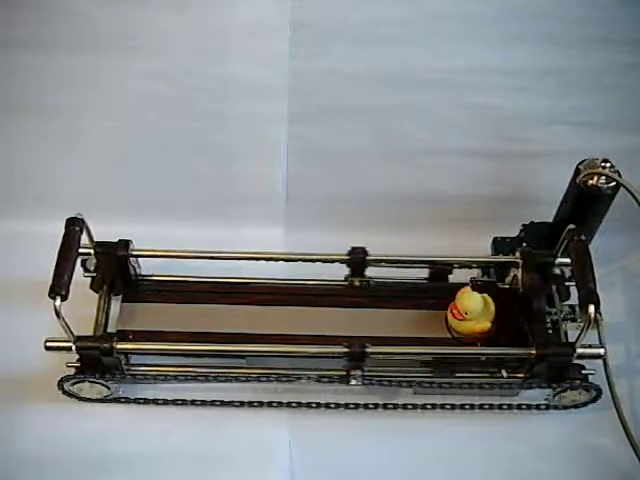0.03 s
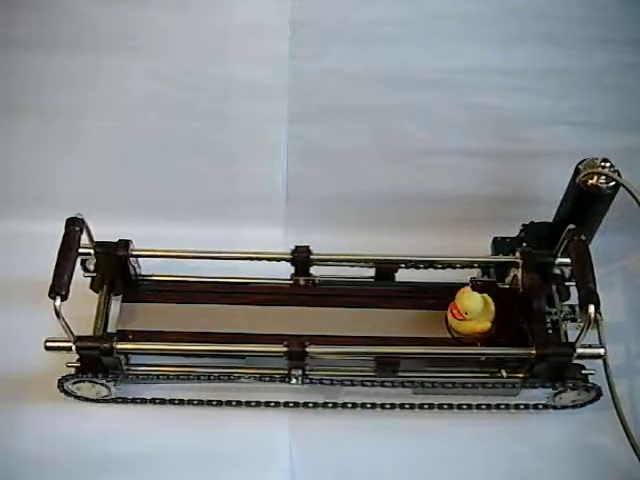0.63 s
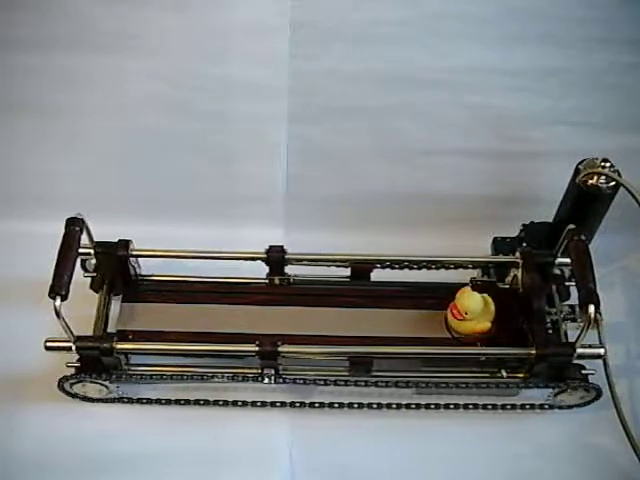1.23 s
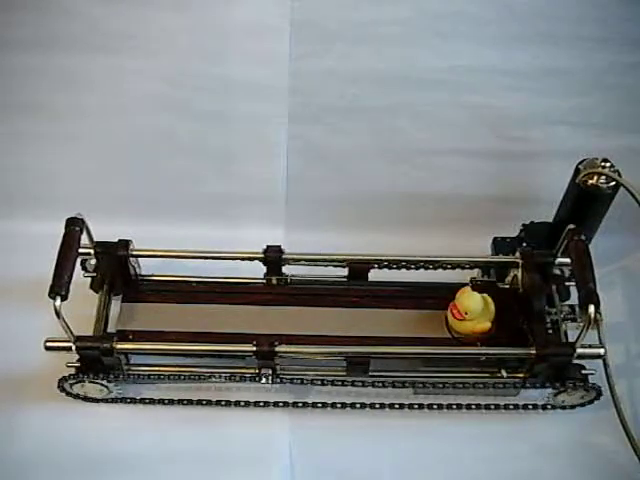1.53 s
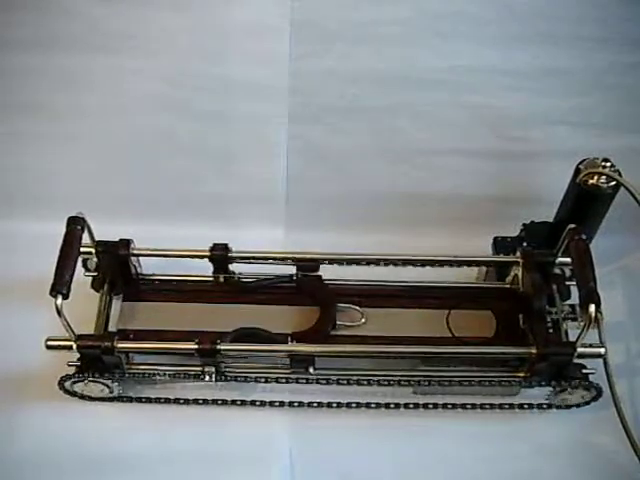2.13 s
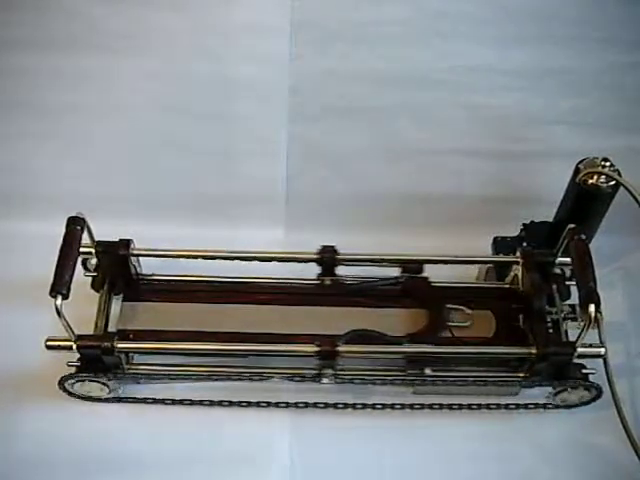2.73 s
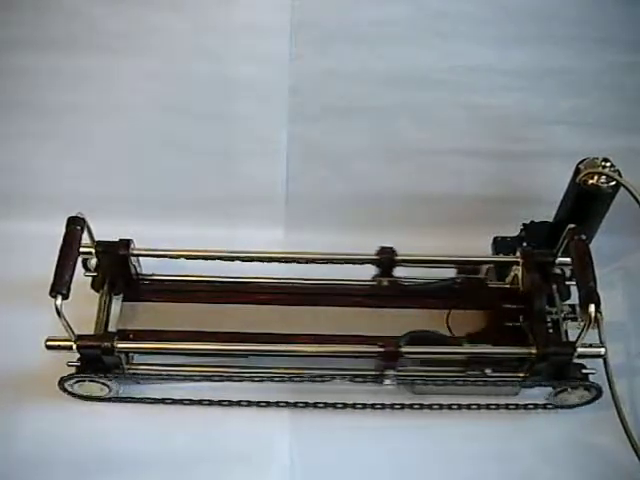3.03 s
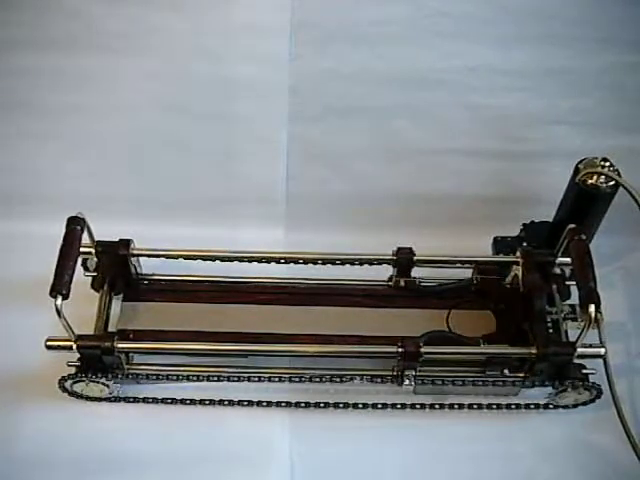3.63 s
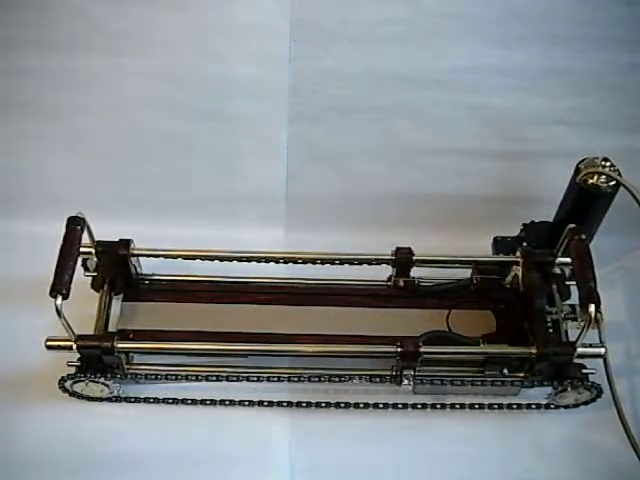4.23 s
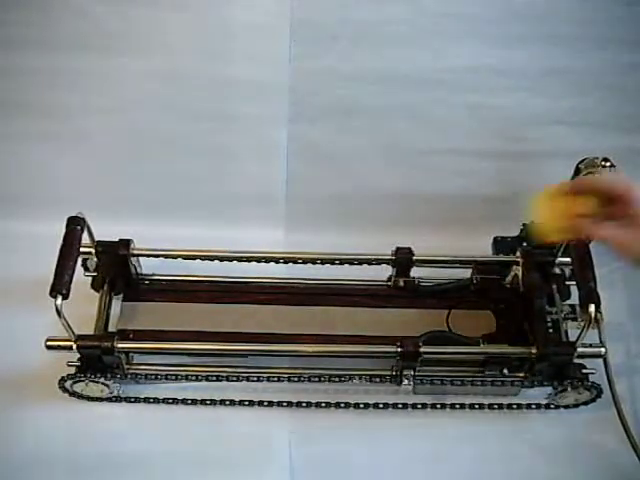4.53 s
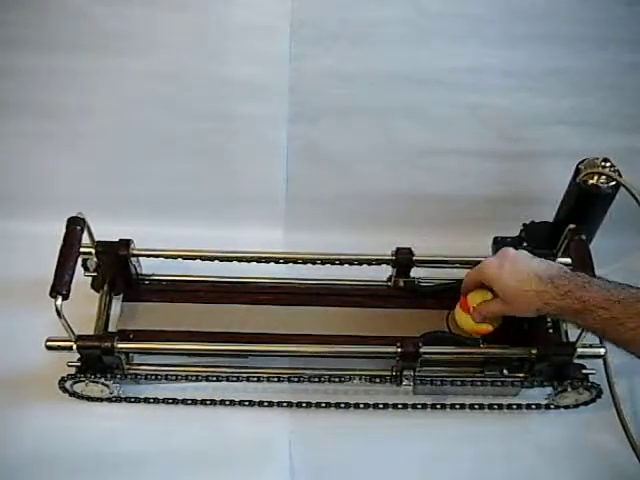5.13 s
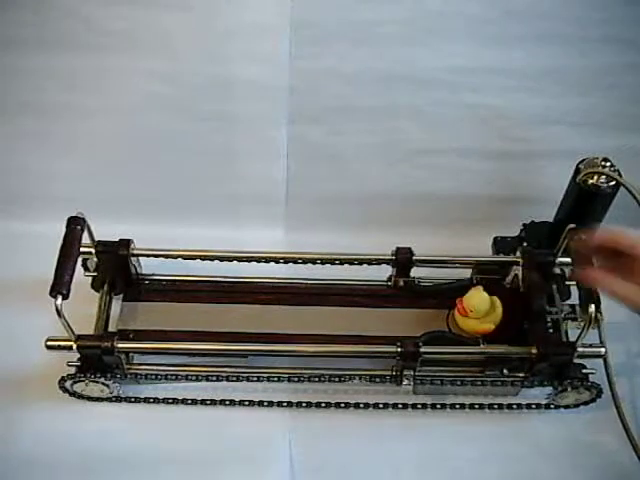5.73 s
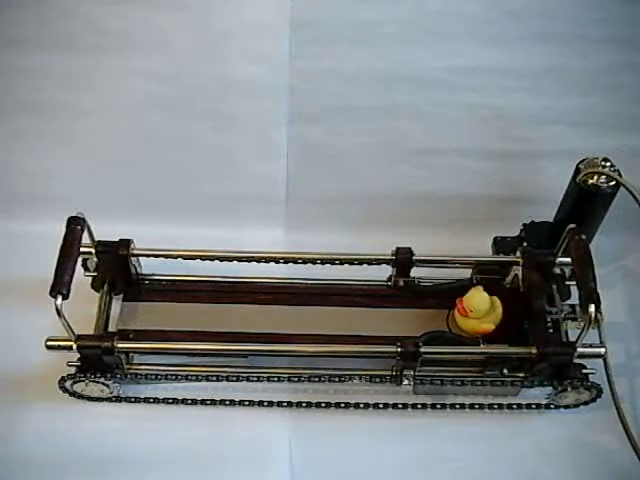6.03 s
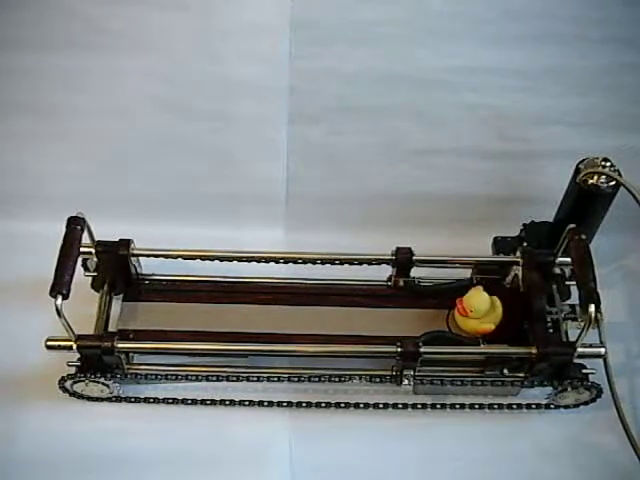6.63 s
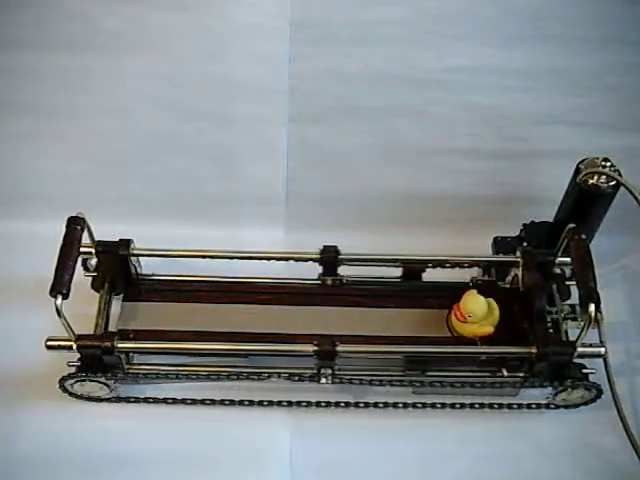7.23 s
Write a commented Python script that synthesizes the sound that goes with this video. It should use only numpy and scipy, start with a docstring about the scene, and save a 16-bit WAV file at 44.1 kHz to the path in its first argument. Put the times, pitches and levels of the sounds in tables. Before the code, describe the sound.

A motor and chain whir as they draw back a spring-loaded launcher. After a brief pause it fires with a loud, clanging slam and a duller bang right behind, overloading the close microphone. A rubber toy bounces, the sled scrapes back along its rails and a catch clicks shut. Later the drive restarts with a clank. Steady hiss, low rumble and fan hum fill the small room.

```python
"""Spring launcher on a table

Indoors, a small microphone close to a motorised launcher that fires a rubber toy. A chain drive draws
the springs; the latch lets go, the sled slams home and a duller bang follows, overloading the microphone.
The toy bounces, the sled scrapes back along its rails and latches with a click; later the drive takes
up the load again. Behind it all, a steady hiss, a low rumble and a fan's hum."""
import sys
import numpy as np
from scipy import signal
from scipy.fft import rfft, irfft, next_fast_len
from scipy.io import wavfile

SR = 44100
rng = np.random.default_rng(int(sys.argv[2]) if len(sys.argv) > 2 else 0)


def transcribe(u):
    """Save the signal u as a 16-bit wav file named by the first command-line argument.

    u: samples, shape (n,) or (channels, n), limited to [-1, 1]; the rate is SR.
    q: integer samples, one column per channel.
    """
    v = np.clip(np.atleast_2d(u).T, -1, 1)
    q = np.round(v * 32767).astype(np.int16)
    wavfile.write(sys.argv[1], SR, q)


N = 325017
TIME = np.arange(N) / SR


def amp(db):
    """Decibels to gain."""
    return 10 ** (np.asarray(db) / 20)


def unit(x):
    """Scales to rms 1."""
    return x / np.sqrt(np.mean(x ** 2) + 1e-20)


def add(mix, start_s, sound):
    """Mixes a sound in at its start time."""
    part = mix[round(start_s * SR):][:len(sound)]
    part += sound[:len(part)]


def colour(x, spectrum):
    """Filters x by a curve of (freq_hz, gain_db) points joined on a log-frequency axis."""
    size = next_fast_len(len(x))
    hz, db = np.transpose(spectrum)
    gain_db = np.interp(np.log(np.fft.rfftfreq(size, 1 / SR) + 1), np.log(hz + 1), db)
    return irfft(rfft(x, size) * amp(gain_db), size)[:len(x)]


def resonate(x, rings):
    """Passes x through steep parallel resonances (centre_hz, width_hz, level_db); rms 1 out."""
    out = 0
    for hz, width, db in rings:
        b, a = signal.iirpeak(hz, hz / width, SR)
        out = out + amp(db) * unit(signal.lfilter(b, a, signal.lfilter(b, a, x)))
    return unit(out)


def low_pass(x, hz, taps):
    """A steep band limit."""
    return signal.oaconvolve(x, signal.firwin(taps, hz, window=("kaiser", 9), fs=SR), "same")


def ring(modes, t):
    """Dying sines of random phase."""
    return sum(amp(db - 60 * t / t60) * np.sin(2 * np.pi * (hz * t + rng.random()))
               for hz, db, t60 in modes)


def drift(per_s):
    """A slow random curve of rms 1."""
    knots = rng.standard_normal(2048)
    return unit(np.interp(TIME * per_s, np.arange(len(knots)), knots))


def ticks(per_s, spread_db):
    """Random tiny impacts, their sizes scattered by spread_db."""
    size = amp(spread_db * np.minimum(rng.exponential(1, N), 4)) * rng.choice([-1, 1], N)
    return unit(size * (rng.random(N) < per_s / SR))


def stroke(start_s, stop_s, attack_s, release_db_per_s):
    """Attack, hold and release, as a gain at every sample."""
    attack = 1 - np.exp(-np.maximum(TIME - start_s, 0) / attack_s)
    return attack * amp(-release_db_per_s * np.maximum(TIME - stop_s, 0))


def frame_blows(modes_db=-17, rise_s=0.0006, rattle_t60_s=0.12, damping_db_per_s=70):
    """Each blow sets the frame rattling and ringing; hard contacts are bright, soft ones thud."""
    # release, two slams, knocks of the return, the drive's clank: start_s, level_db, bass_db, treble_db
    blows = [ (1.631, -48, -5, 9.5), (1.6418, -12.5, -10, 4), (1.6651, 1, -6, -1), (1.683, -7, 6.5, 0.5),
             (1.7155, -6, -14, -26), (1.733, -15, -13, -7), (1.755, -21.5, 8, -4), (1.7962, 2, -3, -13),
             (1.812, -6.5, 0, -37), (1.851, -26, 17, 2), (1.909, -32, -6, -1.5), (2.066, -40.5, -14, -2),
             (2.0803, -36.5, 3, 0.5), (2.381, -35.5, 11, -10), (2.552, -37, 19.5, -3),
             (2.9396, -39.5, -5, 5), (3.005, -33, -11, -2.5), (3.058, -34.5, -2, 1), (3.484, -45, 6, -5),
             (3.724, -39, -9, -27), (3.811, -38.5, 2, -8), (6.695, -37, 7, -4), (6.715, -29.5, -8, 3.5),
             (6.752, -38, 6, -5)]
    # dense ringing of the frame: freq_hz, density_db
    frame_spectrum = [(30, -8.5), (60, -11), (125, -7.5), (240, -13), (335, -9), (560, -14), (850, -8),
                      (1030, -12.5), (1300, -16), (1650, -14), (2450, -10), (3400, -12), (4700, -15),
                      (5900, -23)]
    # its strongest modes, before the joints damp them: pitch_hz, level_db, t60_s
    frame_modes = [(118.3, -7, 0.23), (130.4, 3, 0.21), (175.7, 5.5, 0.22), (289.5, -4.5, 0.19),
                   (337, 7, 0.05), (498, -6, 0.29), (656, -2, 0.12), (770, 0, 0.083), (826, -3, 0.2),
                   (853, 2.5, 0.17), (1130, -2, 0.068), (1265, 5.5, 0.095), (1450, 4, 0.056),
                   (1710, -17, 0.13), (1804, -7, 0.14), (2000, -1.5, 0.25), (2355, 3, 0.17),
                   (2590, -4, 0.1)]
    out, t = np.zeros(N), np.arange(SR // 2) / SR
    for start_s, db, bass_db, treble_db in blows:
        rattle = unit(colour(rng.standard_normal(len(t)), frame_spectrum)) * amp(-60 * t / rattle_t60_s)
        tones = amp(modes_db - damping_db_per_s * t) * ring(frame_modes, t)  # loose joints soak it up
        hit = (rattle + tones) * (1 - np.exp(-t / rise_s))
        contact = [(150, bass_db), (600, 0), (1400, 0.0016), (4500, treble_db)]
        padded = np.pad(hit, (SR // 100, 0))  # 10 ms of lead for the filter to spread into
        add(out, start_s - .01, amp(db) * colour(padded, contact))
    return out


def springs(rise_s=0.0015, t60_s=0.15):
    """The springs and guide rods take up each jolt and clang in many close modes."""
    # jolts to the steel: start_s, level_db
    jolts = [(1.6437, -11.5), (1.65, -19), (1.666, -8), (1.692, -12), (6.657, -40), (6.716, -42)]
    # its bright clusters of modes: centre_hz, width_hz, level_db
    steel_rings = [(1320, 140, 1), (1980, 170, -6), (2390, 220, -2.5), (2674, 450, 7.5), (3210, 220, -14),
                   (3970, 200, -7.5), (4050, 240, -13), (4760, 600, 0.5)]
    out, t = np.zeros(N), np.arange(SR // 2) / SR
    for start_s, db in jolts:
        clang = resonate(rng.standard_normal(len(t)), steel_rings)
        add(out, start_s, amp(db - 60 * t / t60_s) * clang * (1 - np.exp(-t / rise_s)))
    return out


def catch(snap_db=-4, snap_t60_s=0.055, rise_s=0.0008):
    """The small steel catch snaps over the sled and bounces."""
    # shutting and settling: start_s, level_db
    clicks = [(3.7887, -25), (3.7973, -29.5)]
    # the catch's modes: pitch_hz, level_db, t60_s
    catch_modes = [(1500, -19, 0.027), (2270, -9, 0.026), (2980, -0.5, 0.039), (3520, -6, .03),
                   (3540, -17, 0.063)]
    # its dry snap: freq_hz, density_db
    snap_spectrum = [(400, -0.5), (1300, -12), (2400, -1.5), (3500, 3), (4100, -13), (5500, -19)]
    out, t = np.zeros(N), np.arange(SR // 5) / SR
    for start_s, db in clicks:
        noise = unit(colour(rng.standard_normal(len(t)), snap_spectrum))
        snap = amp(snap_db - 60 * t / snap_t60_s) * noise
        add(out, start_s, amp(db) * (ring(catch_modes, t) + snap) * (1 - np.exp(-t / rise_s)))
    return out


def sled(start_s=2.075, meets_catch_s=2.95, stop_s=3.085, grind_rise_db_per_s=60.5):
    """Grains of friction ring the rails as the sled is hauled back; last, it grinds up the catch."""
    # broad scrape of the rails: freq_hz, density_db
    rail_spectrum = [(29, -38), (50, -2), (130, -17), (301, -11.5), (391, -35), (468, -17), (1040, -18.5),
                     (1150, -18), (1610, -27.5), (2880, -26), (3370, -27), (4930, -29), (5900, -34.5),
                     (7670, -54), (13000, -120)]
    # their resonances: centre_hz, width_hz, level_db
    rail_rings = [(805, 110, -6), (1170, 110, -9), (1980, 240, -1), (2440, 360, 0), (2810, 520, 1),
                  (3940, 120, -10), (4310, 1200, -17)]
    grains = ticks(per_s=2500, spread_db=2) * amp(1.3 * drift(per_s=50))
    scrape = amp(3) * unit(colour(grains, rail_spectrum)) + amp(-8) * resonate(grains, rail_rings)
    grind = resonate(ticks(per_s=2000, spread_db=0), [(2370, 1000, 0.015), (4250, 910, 0)])
    rub_db = -48.5 + 4.5 * np.exp(-((TIME - 2.45) / 0.086) ** 2)  # a tight spot on the rails
    press_db = -49 + grind_rise_db_per_s * (np.clip(TIME, meets_catch_s, stop_s) - meets_catch_s)
    sliding = stroke(start_s, stop_s, attack_s=0.0069, release_db_per_s=330)
    climbing = stroke(meets_catch_s, stop_s, attack_s=.003, release_db_per_s=594)
    return sliding * amp(rub_db) * scrape + climbing * amp(press_db) * grind


def drive_effort(surge_db=6.5, surge_s=0.046):
    """How hard the drive runs, as a gain: each spell surges, sags as any load builds, and runs down."""
    # drawing, hauling back, creeping to the latch, drawing again: start_s, stop_s, level_db, sag_db_per_s
    spells = [(-.3, 1.4, 1.5, 11), (2.15, 3.1, -2.5, 0), (3.1, 3.75, -14, 3), (6.665, 7.45, 1, 10)]
    out = np.zeros(N)
    for start_s, stop_s, db, sag_db_per_s in spells:
        age = np.maximum(TIME - start_s, 0)
        running = stroke(start_s, stop_s, attack_s=0.012, release_db_per_s=107)
        out += running * amp(db + surge_db * np.exp(-age / surge_s) - sag_db_per_s * age)
    return out


def chain_drive(effort, gears_db=-44, chain_db=-50.5, links_per_s=26):
    """Gears growl in their housing; the chain rustles onto the sprocket and once squeaks faintly."""
    # resonances of the gearbox: centre_hz, width_hz, level_db
    gearbox_rings = [(164.4, 41, -2), (217, 16, -16.5), (282, 51, -0.5), (546, 61, -12.5), (737, 32, -16.5)]
    # resonances of the chain: centre_hz, width_hz, level_db
    chain_rings = [(1183, 340, 2), (1420, 98, -14.5), (2016, 69, -3.5), (2480, 710, 2), (2704, 70, -7.5),
                   (2950, 100, -4), (3670, 1040, 0.5), (4360, 1100, -1), (4770, 320, -9.5)]
    growl = resonate(rng.standard_normal(N), gearbox_rings)
    links = np.cumsum(links_per_s * (1 + 0.07 * drift(per_s=6))) / SR
    link_pulse = amp(1.6 * np.cos(2 * np.pi * links))
    rustle = resonate(ticks(per_s=1800, spread_db=2) * link_pulse, chain_rings)
    squeak_gain = amp(-58) * np.exp(-((TIME - .55) / .06) ** 2)
    squeak = squeak_gain * resonate(rng.standard_normal(N), [(4120, 160, 0)])
    return amp(gears_db) * effort * growl + amp(chain_db) * effort ** 1.53 * rustle + squeak


def toy(landing_s=2.1117, landing_db=-25.5, hop_s=0.021, hop_shrink=0.76, hop_loss_db=5.5):
    """The hollow rubber toy lands and bounces, each hop quicker and weaker."""
    # resonances of its body: centre_hz, width_hz, level_db
    toy_rings = [(303, 170, 0), (626, 110, -2.5), (766, 160, 5), (1070, 250, -5.5), (1320, 170, -24)]
    rise_s, t60_s = 0.00099, 0.099
    out, t, start_s = np.zeros(N), np.arange(SR // 4) / SR, landing_s
    for hop in range(4):
        knock = resonate(rng.standard_normal(len(t)), toy_rings) * (1 - np.exp(-t / rise_s))
        add(out, start_s, amp(landing_db - hop_loss_db * hop - 60 * t / t60_s) * knock)
        start_s += hop_s * hop_shrink ** hop
    return out


def table(effort, rock_hz=36.22, rock_t60_s=0.86, rest_db=-48.5, driven_db=-46.5):
    """The table rocks at one low note when shoved, thuds when bumped, and trembles with the drive."""
    # shoves that rock it: start_s, level_db
    shoves = [(1.8119, -7.5), (2.537, -26.5), (2.79, -33.5), (3.171, -32), (3.823, -34), (3.961, -34.5)]
    # the mechanism bumping the top: start_s, level_db
    bumps = [(2.377, -37), (2.5433, -27.5), (2.571, -34), (3.085, -35.5), (3.486, -38.5), (3.812, -34),
             (6.697, -45)]
    # the top's dull modes: pitch_hz, level_db, t60_s
    top_modes = [(58, 0, 0.14), (94, -9, 0.098), (124, 0, 0.19), (211, -4, 0.087), (288, -4.5, 0.1),
                 (513, -5.5, 0.066)]
    out, t = np.zeros(N), np.arange(SR) / SR
    for start_s, db in shoves:
        add(out, start_s, amp(db - 60 * t / rock_t60_s) * np.sin(2 * np.pi * rock_hz * t))
    for start_s, db in bumps:
        add(out, start_s, amp(db) * ring(top_modes, t) * (1 - np.exp(-t / .002)))
    tremble = np.hypot(amp(rest_db), amp(driven_db) * effort)
    return out + tremble * resonate(rng.standard_normal(N), [(rock_hz, 15, 0)])


def reflections(x, t60_s=0.21, echoes_per_s=2500, first_s=.004):
    """Sparse echoes off the walls of a small room."""
    t = np.arange(SR // 2) / SR
    echoes = rng.choice([-1, 1], len(t)) * (rng.random(len(t)) < echoes_per_s / SR)
    response = echoes * (t > first_s) * amp(-60 * t / t60_s)
    return signal.oaconvolve(x, response / np.linalg.norm(response))[:N]


def background(hiss_db=-46, drone_db=-58.5, hum_trim_db=-2):
    """Steady background hiss and low rumble, with a fan's wavering hum and soft drone."""
    # the hiss and rumble: freq_hz, density_db
    hiss_spectrum = [(11, -44), (18, 2), (49, -4.5), (65, -11.5), (98, -2.5), (148, -14), (184, -7.5),
                     (338, -12.5), (363, -14), (391, -21), (431, -15), (635, -17.5), (770, -20.5),
                     (4740, -29.5), (5900, -33), (7670, -72), (13000, -120)]
    # partials of the fan's hum: pitch_hz, level_db
    hum_partials = [(91.5, -51.5), (188.4, -68), (366.1, -60), (430.7, -69.5), (646.0, -63.5)]
    hiss = unit(colour(rng.standard_normal(N), hiss_spectrum))
    drone = resonate(rng.standard_normal(N), [(241, 37, 0.5), (312.6, 60, -13), (719, 310, -1.5)])
    fan_time = np.cumsum(1 + 0.00806 * drift(per_s=6.3)) / SR
    hum = sum(amp(db + hum_trim_db + 2 * drift(per_s=10)) * np.sin(2 * np.pi * hz * fan_time)
              for hz, db in hum_partials)
    return amp(hiss_db) * hiss + amp(drone_db) * drone + np.sqrt(2) * hum


def scene():
    """The launcher close up on its table, in a small room; mono."""
    effort = drive_effort()
    direct = frame_blows() + springs() + catch() + sled() + chain_drive(effort) + toy()
    return (direct + amp(-10.5) * reflections(direct) + table(effort) + background())[None]


def record(dry, overload=0.83, ceiling=0.73, knee=16):
    """The microphone overloads, its narrow voice band rounds that off, and peaks flatten at a ceiling."""
    # the input's treble response: freq_hz, gain_db
    treble = [(5500, 0), (10000, 0.5), (15500, 1.5)]
    clipped = np.clip(dry[0], -overload, overload)
    narrow = low_pass(clipped, hz=5654, taps=151)
    flattened = narrow / (1 + np.abs(narrow / ceiling) ** knee) ** (1 / knee)
    return low_pass(colour(flattened, treble), hz=16000, taps=511)[None]


dry = scene()
out = record(dry)
transcribe(out)
```